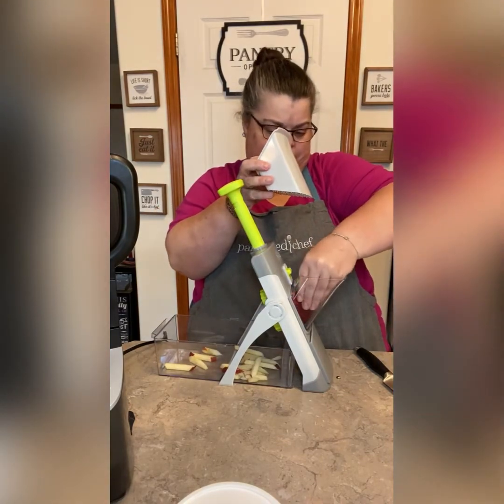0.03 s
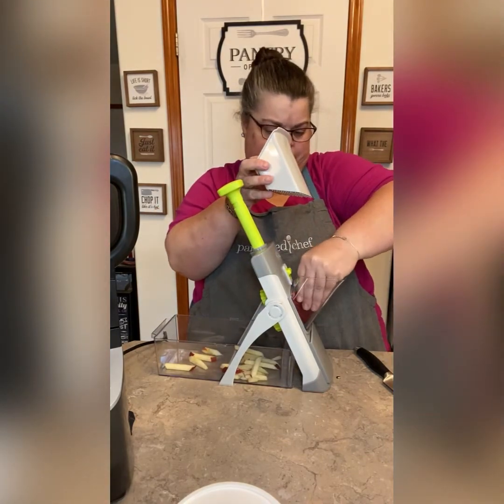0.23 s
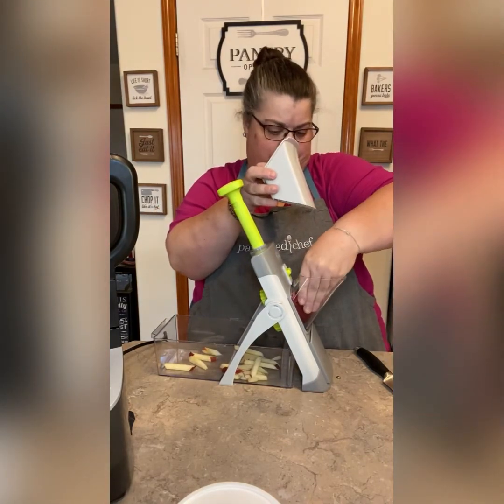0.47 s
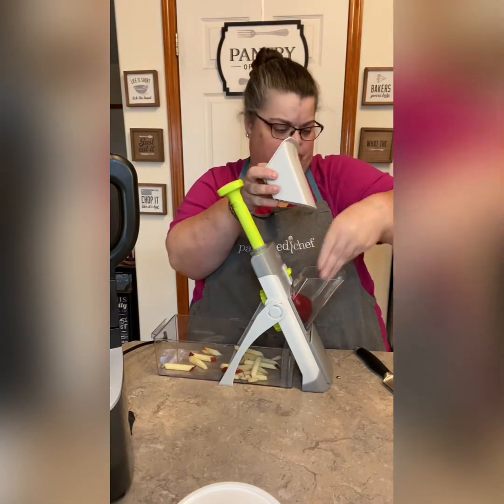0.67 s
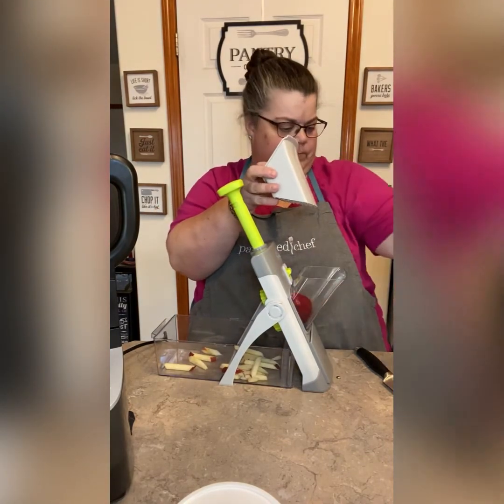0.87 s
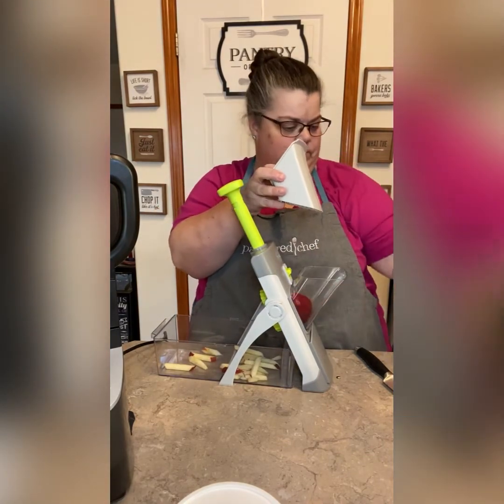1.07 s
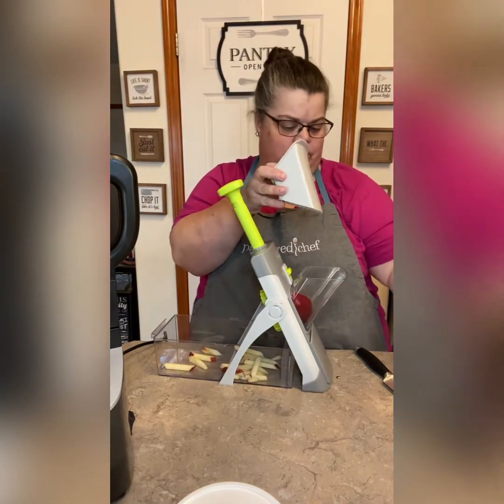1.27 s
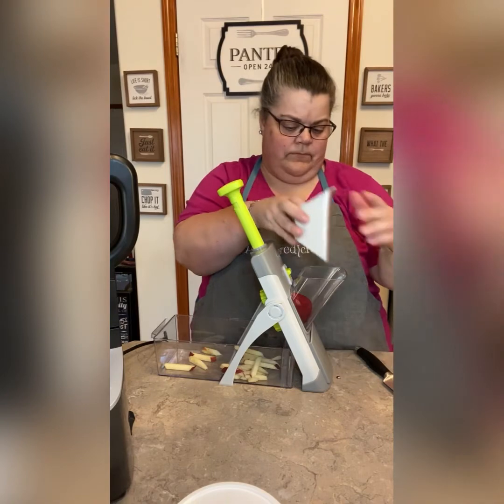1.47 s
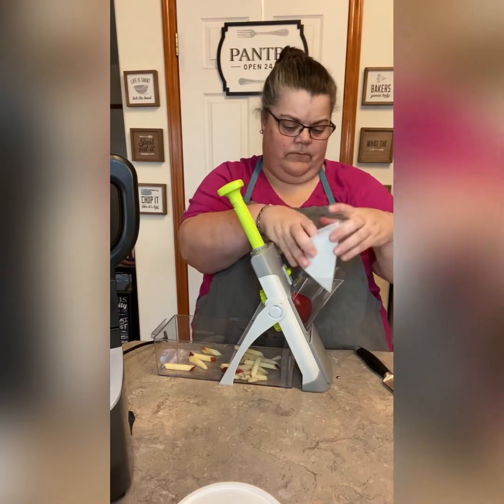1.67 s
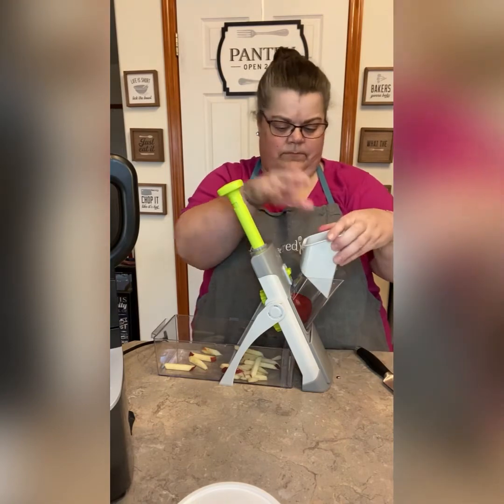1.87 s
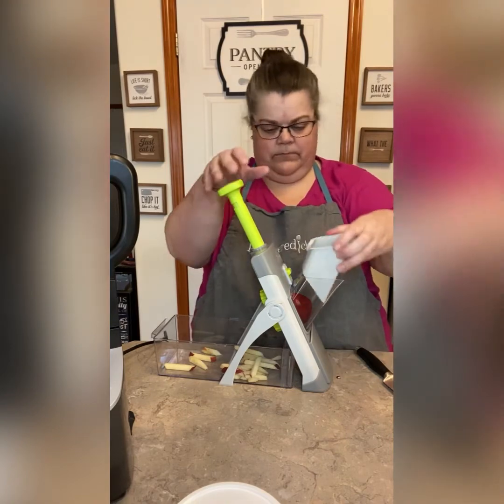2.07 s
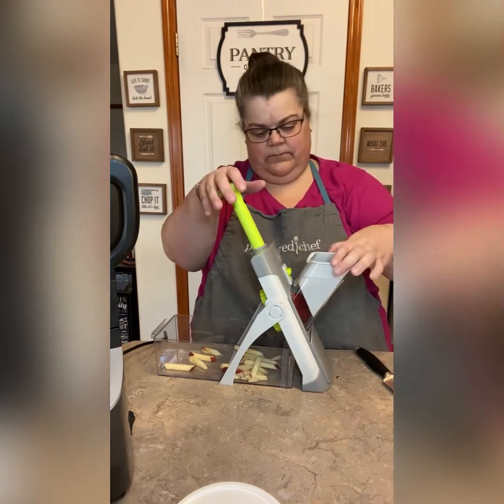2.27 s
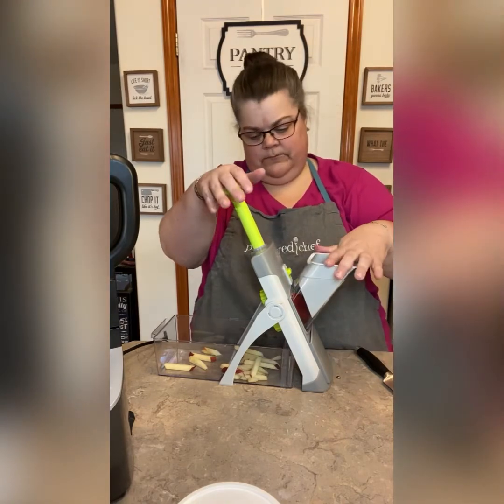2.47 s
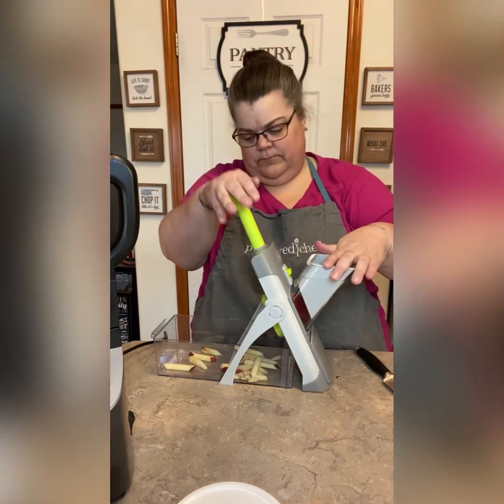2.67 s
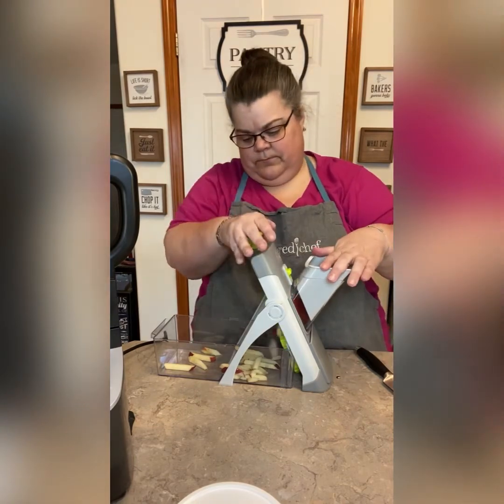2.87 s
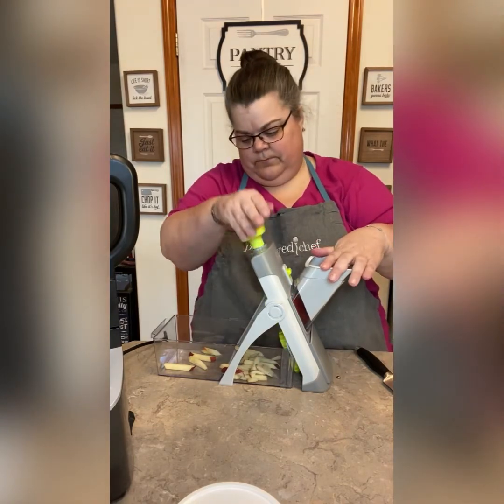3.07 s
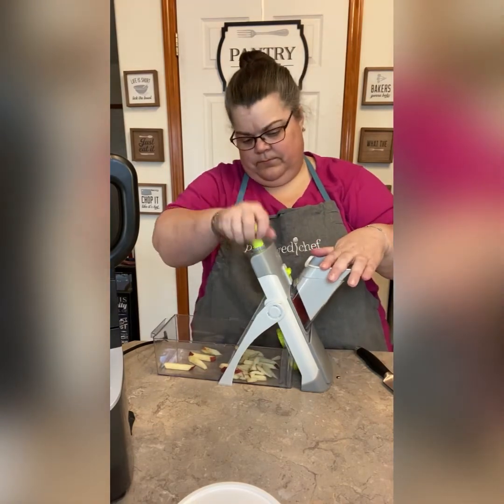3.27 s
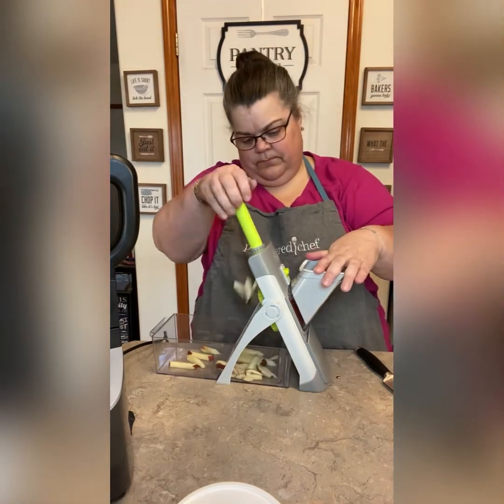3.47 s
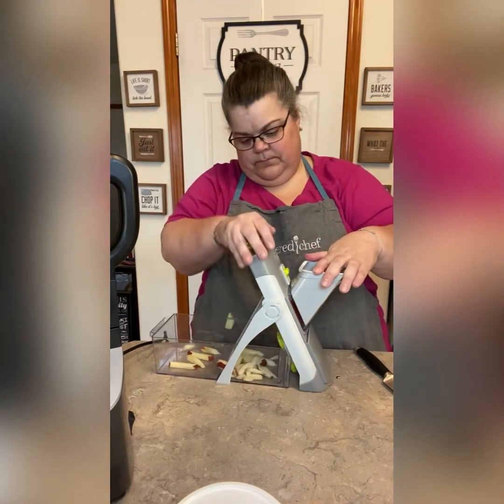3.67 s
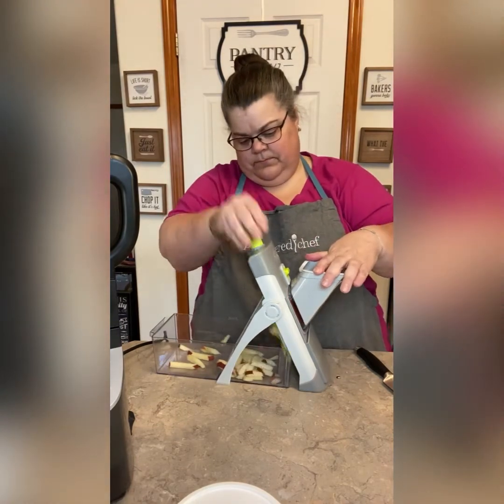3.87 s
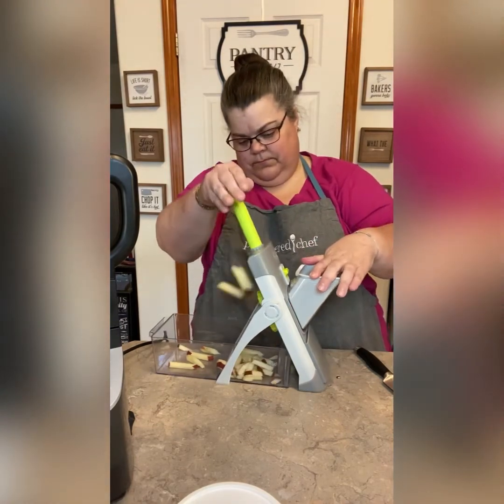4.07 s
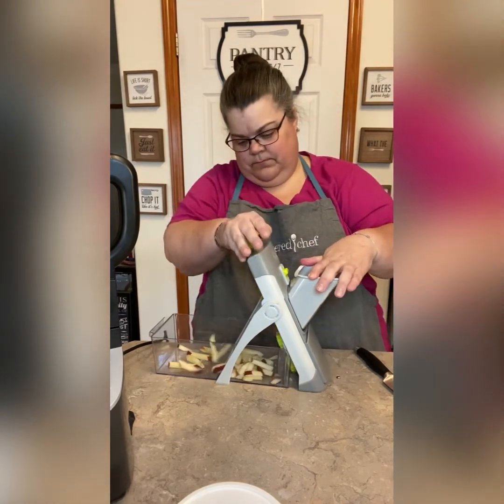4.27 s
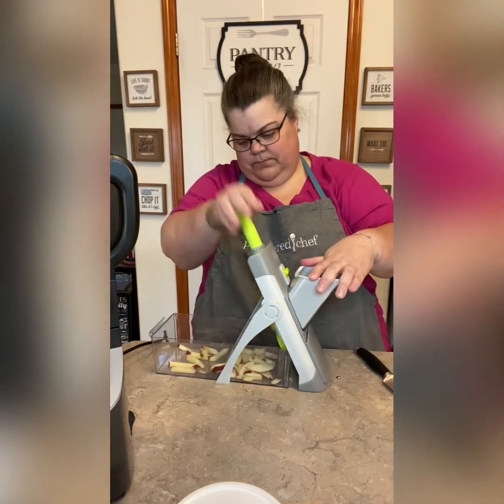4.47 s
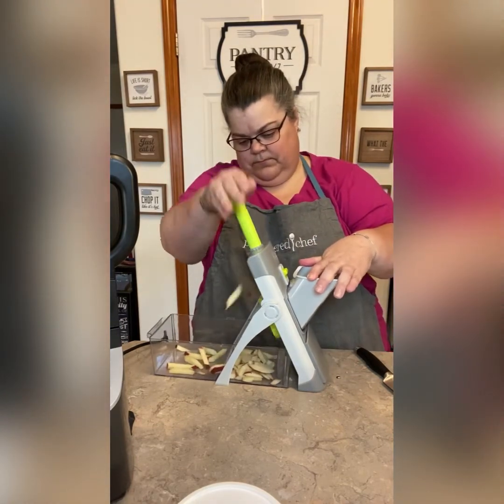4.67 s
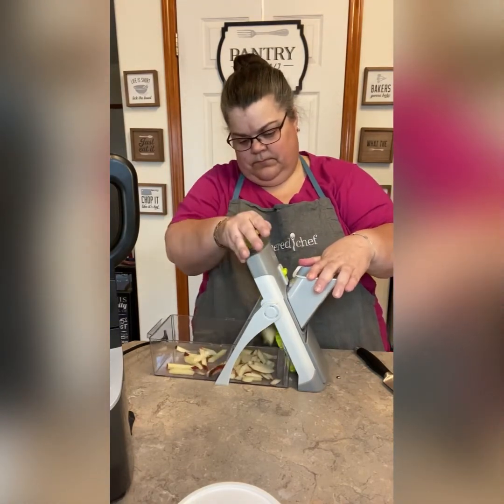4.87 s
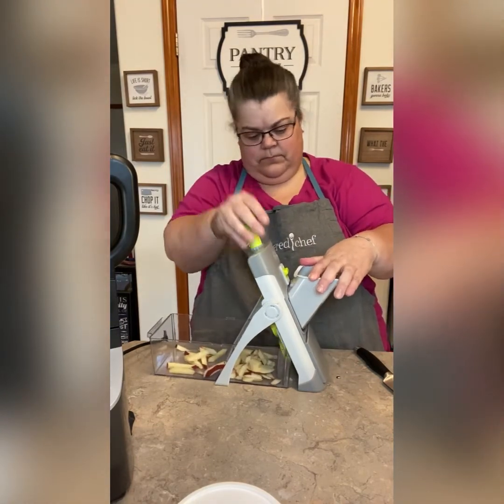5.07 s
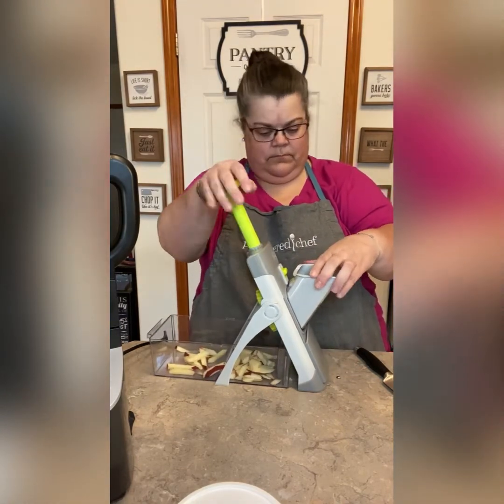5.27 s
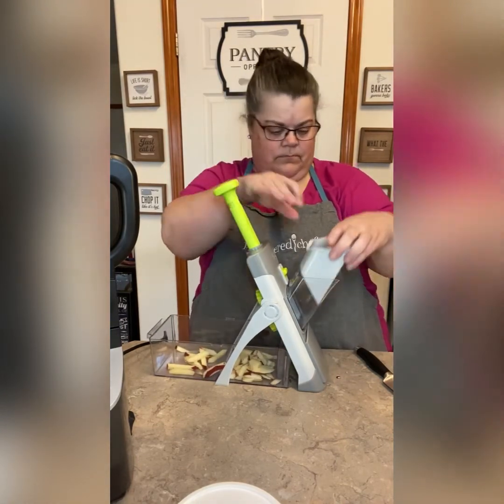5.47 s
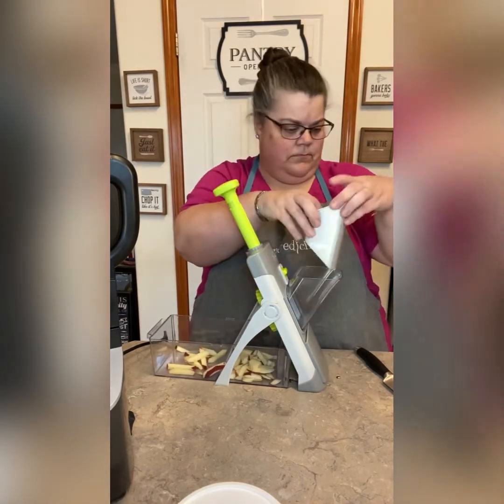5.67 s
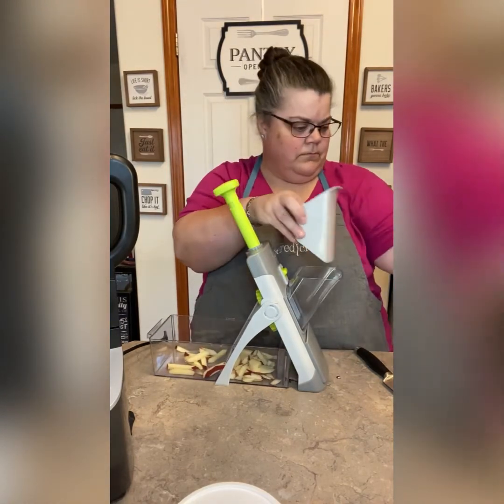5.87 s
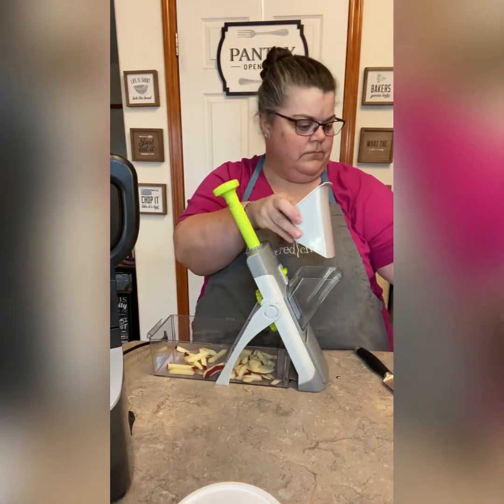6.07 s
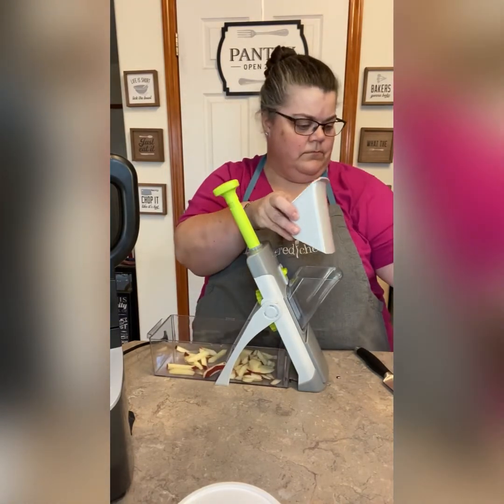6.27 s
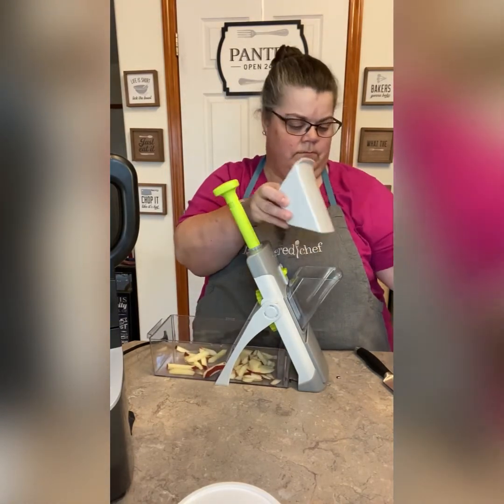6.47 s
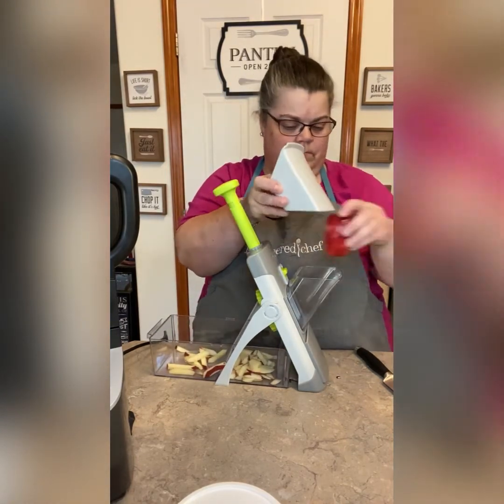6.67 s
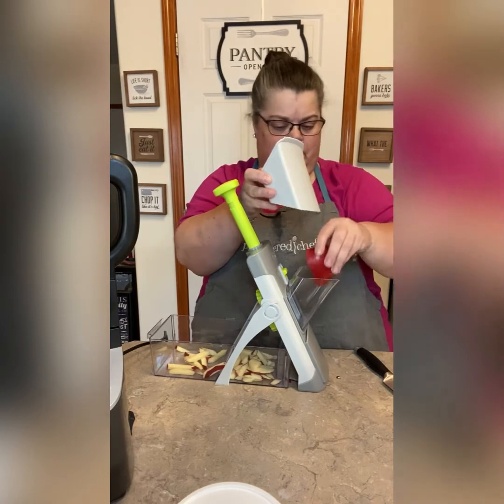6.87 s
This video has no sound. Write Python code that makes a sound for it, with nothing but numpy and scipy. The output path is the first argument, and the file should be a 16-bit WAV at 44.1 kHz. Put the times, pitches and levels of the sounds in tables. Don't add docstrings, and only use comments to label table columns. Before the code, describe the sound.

A plastic slicer's plunger is pumped four times, blade rasping through apple to heavy thumps and clacking back up in a hard, quiet kitchen.

```python
import sys
import numpy as np
from scipy import signal
from scipy.fft import rfft, irfft, next_fast_len
from scipy.io import wavfile
from scipy.ndimage import uniform_filter1d, map_coordinates

SR = 44100
rng = np.random.default_rng(int(sys.argv[2]) if len(sys.argv) > 2 else 0)


def voltage_ratio(decibels):
    exponent = np.asarray(decibels, float) / 20
    return 10 ** exponent


def persist_wave(psi):
    counts = np.round(np.clip(psi, -1, 1) * 32767).astype(np.int16)
    wavfile.write(sys.argv[1], SR, np.atleast_2d(counts).T)


N = 305172


def along(table, hz, axis=1):
    rows = np.array(table, float)
    return np.interp(np.log(hz + 1), np.log(rows[:, 0] + 1), rows[:, axis])


def share_of(k, centres, hz):
    return np.interp(np.log(hz + 1), np.log(centres), np.arange(len(centres)) == k)


def peak(hz, centre, width):
    return 1 / (1 + (2 * (hz - centre) / width) ** 2)


def colour(x, gain):
    size = next_fast_len(x.shape[-1], True)
    spectrum = rfft(x, size) * gain(np.fft.rfftfreq(size, 1 / SR))
    return irfft(spectrum, size)[..., :x.shape[-1]]


def unit(x):
    return x / np.sqrt(np.mean(x ** 2))


def walk(rate):
    k = int(SR / rate)
    return uniform_filter1d(np.repeat(rng.standard_normal(N // k + 1), k), k)[:N]


# f/Hz, left lead/rad
PORT_LEAD = [(60, 0), (200, .05), (430, -.2), (780, -.9), (1290, -.4), (2300, -.8), (4000, -.6),
             (7500, -.4), (9560, -1.1), (12200, -2.75), (16000, -3)]
# f/Hz, left minus right level/dB
PORT_DB = [(60, 0), (110, .3), (200, 1.2), (380, 3), (700, 3.6), (1290, 1.3), (2380, 1.2), (4400, -.3),
           (15000, -.2)]


def ports(x):
    def port(side):
        return colour(x, lambda hz: voltage_ratio(side * along(PORT_DB, hz) / 2) * np.exp(.5j * side * along(PORT_LEAD, hz)))
    return np.array([port(1), port(-1)])


# f/Hz, likeness/0..1
ALIKE = [(60, 1), (200, .995), (600, .25), (1500, .6), (3000, .2), (6000, .45), (14000, .9)]


def spread(size):
    same, left, right = rng.standard_normal((3, size))

    def alike(hz):
        return np.clip(along(ALIKE, hz), 0, 1)
    common = colour(same, lambda hz: np.sqrt(alike(hz)))
    own = colour(np.array([left, right]), lambda hz: np.sqrt(1 - alike(hz)))
    return ports(common) + own


# f/Hz, level/dB per Hz
FLOOR = [(20, -27), (60, -15), (146, -9.5), (270, -21), (410, -30.5), (825, -40.5), (1370, -47),
         (3000, -47.5), (4200, -53), (16000, -63.5)]
# f/Hz, width/Hz, level/dB
HUM = [(61, 8, -64), (122, 10, -67), (170, 4, -63), (240, 6, -70)]


def fridge():
    floor_db, air_db = -54.5, -6
    air = unit(colour(spread(N), lambda hz: voltage_ratio(along(FLOOR, hz))))
    air = voltage_ratio(floor_db + air_db + 0.43 * walk(1.4)) * air
    for centre, width, db in HUM:
        line = colour(rng.standard_normal(N), lambda hz: peak(hz, centre, width))
        air = air + voltage_ratio(db) * unit(line)
    return air


def swell(start, end, start_db, end_db):
    t = np.arange(0, N + 32, 32) / SR
    edge_s = .025
    edges = np.clip((t - start) / edge_s + .5, 0, 1) * np.clip((end - t) / edge_s + .5, 0, 1)
    return edges * voltage_ratio(np.interp(t, [start, end], [start_db, end_db]))


# start t/s, end t/s, start level/dB, end level/dB, hiss level/dB
SLIDES = [(-.01, 0.32, -83.5, -83, 11), (0.26, 0.49, -65.5, -96, 14), (1.513, 1.693, -46.5, -69.5, -15.5),
          (1.957, 2.133, -73, -47.5, -4), (2.133, 2.244, -48, -47.5, -10), (2.328, 2.537, -60, -74.5, 0.5),
          (2.535, 2.702, -76, -47.5, -2.5), (3.183, 3.242, -50, -63.5, -10.5),
          (5.314, 5.451, -68, -56, -0.5), (5.477, 5.583, -52, -58.5, -10), (5.58, 5.695, -52, -68, -5),
          (5.797, 5.98, -76.5, -86, -30), (4.28, 4.4, -50, -50, -27), (5.004, 5.117, -54.5, -55, -16),
          (6.259, 6.349, -84, -87.5, 8), (6.693, 6.824, -80, -85.5, 10.5)]


def slides():
    rumble_db, ring_db = -5, -4.5
    weights = 0
    for start, end, start_db, end_db, hiss_db in SLIDES:
        bands = voltage_ratio([rumble_db, 0, hiss_db, ring_db])
        weights = weights + np.outer(bands, swell(start, end, start_db, end_db))
    return weights


def patchy(x):
    depth_db, patch_hz, patch_s = 3.6, 350, .03
    hz, t, cells = signal.stft(x, SR, nperseg=256)
    field = rng.standard_normal((int(hz[-1] / patch_hz) + 2, int(t[-1] / patch_s) + 2))
    places = np.meshgrid(hz / patch_hz, t / patch_s, indexing="ij")
    lift = map_coordinates(field, places, order=1)
    return signal.istft(cells * voltage_ratio(depth_db * lift), SR, nperseg=256)[1][:N]


# f/Hz, level/dB per Hz
RASP = [(35, -41), (60, 6.5), (113, 5.5), (354, -9), (715, -15), (903, -18), (2090, -18.5), (4640, -27),
        (6140, -27.5), (11500, -33), (13000, -33), (13900, -96), (16000, -103.5)]
# f/Hz, width/Hz, level/dB
RASP_PEAKS = [(816.7, 47, 6), (1090, 200, -3), (2330, 150, -6.5), (3150, 110, -1), (5560, 2600, 2.5)]


def rasp_colour(hz):
    lift = sum(db * peak(hz, centre, width) for centre, width, db in RASP_PEAKS)
    return voltage_ratio(along(RASP, hz) + lift)


def pressed(band, weight):
    return unit(band) * np.repeat(weight, 32)[:N] * voltage_ratio(2.2 * walk(25))


RUB_HZ = [180, 1500, 7000]
# f/Hz, level/dB, t60/s
CHUTE = [(400, -8, .03), (560, -5, .025), (800, 0, .028), (960, -1, .022), (1300, -6, .014),
         (2260, -6, .012), (2560, -5, .012), (3100, -8, .008)]


def rubbing():
    snap_size, snaps_per_s = 2.5, 300
    grit = rng.standard_normal(N) * voltage_ratio(3.0 * walk(900) + 2.5 * walk(150) + walk(40))
    grit = patchy(grit * (1 + snap_size * (rng.random(N) < snaps_per_s / SR)))

    def chute_gain(hz):
        return sum(voltage_ratio(db) / (1 + 1j * (hz - centre) * t60 / 1.6) for centre, db, t60 in CHUTE)
    bands = [colour(grit, lambda hz: rasp_colour(hz) * share_of(k, RUB_HZ, hz)) for k in range(3)]
    bands.append(colour(grit, chute_gain))
    weights = slides() + cuts() + returns()
    return sum(pressed(band, weight) for band, weight in zip(bands, weights)) + squeak()


# f/Hz, t60/s, level/dB
ROOM = [(60, 0.041, -4.5), (198, 0.37, -8), (700, 0.4, -7.5), (2568, 0.37, -3), (7000, .4, -11.5),
        (12100, 0.4, -16.5)]


def kitchen(x):
    t, noise, tail = np.arange(SR) / SR, spread(SR), 0
    for k, (_, t60, db) in enumerate(ROOM):
        share = np.transpose([np.array(ROOM)[:, 0], np.arange(len(ROOM)) == k])
        fade = voltage_ratio(-60 * t / t60) * np.clip(t / 0.002 - .5, 0, 1)
        band = colour(noise, lambda hz: along(share, hz))
        tail = tail + voltage_ratio(db) * band * fade / np.sqrt(np.sum(fade ** 2))
    return signal.fftconvolve(x[None], tail, axes=1)[:, :N]


def ring(modes, t, scatter_db):
    hz, db, t60 = np.transpose(modes)[:, :, None]
    chance = rng.standard_normal((2, len(hz), 1))
    turn = 2 * np.pi * hz * (1 + 0.025 * chance[0]) * t
    return np.sum(voltage_ratio(db + scatter_db * chance[1]) * np.sin(turn) * voltage_ratio(-60 * t / t60), axis=0)


# f/Hz, level/dB, t60/s
COUNTER = [(59, -14, .4), (80, -5, .14), (98, -3, .13), (118, -3, .14), (172, -10, .2), (200, -8, .1),
           (245, -12, .12), (307, -18, .12), (388, -22, .1)]
# f/Hz, level/dB, t60/s
SWAY = [(60, -21, 0.13), (82.3, -9.5, 0.32)]


def thud(t):
    swing_hz, swing_s, sink_turns, sink_s = 98., .022, .8, .007
    hum_db, hum_on_s, sway_on_s = -7.5, .03, 0.056
    late = np.maximum(t[::8] - .0035, 0)
    turns = swing_hz * late + sink_turns * (1 - np.exp(-late / sink_s))
    swings = -np.sin(2 * np.pi * turns) * np.exp(-(late / swing_s) ** 2)
    hum = voltage_ratio(hum_db) * ring(COUNTER, late, 3.0) * (1 - np.exp(-late / hum_on_s))
    sway = ring(SWAY, late, 2.0) * (1 - np.exp(-late / sway_on_s))
    places = np.arange(len(t))
    return np.interp(places, places[::8], swings + hum + sway)


def chatter_of(after, rattle_s):
    push = rng.standard_normal(len(after)) * np.exp(-(after / rattle_s) ** 2)
    chatter = rfft(push * np.minimum(after / .001, 1))
    even = irfft(chatter / np.abs(chatter))
    loose = rng.standard_normal(len(after)) ** 3 * np.exp(-after / (3.1 * rattle_s))
    loose = loose * np.minimum(after / 0.0055, 1)
    return even / np.abs(even).max() + voltage_ratio(-26.5) * loose


# f/Hz, level/dB per Hz
CRACK = [(150, -12), (400, -3), (800, 0), (1550, -8), (2200, -4), (3200, -8), (4600, -16), (6200, -14),
         (10000, -22), (13200, -29), (14000, -55), (16500, -62), (17500, -110)]
BLOW_HZ = [330, 950, 2500, 7000]


def blows(table, voice_db, modes, rattle_s):
    crack_db, upper_per_hardness = 5, .6
    out, t = np.zeros(N + SR), np.arange(-256, 16128) / SR
    after, hz = np.maximum(t, 0), np.fft.rfftfreq(len(t), 1 / SR)
    crackle = voltage_ratio(along(CRACK, hz))
    shares = [share_of(k, BLOW_HZ, hz) for k in range(4)]
    thump_db, low_db, upper_db, high_db = voice_db
    for s, db, weight_db, hard_db in table:
        chatter = rfft(chatter_of(after, rattle_s) * (t > 0) * (t < .12))
        body = irfft(chatter * rfft(ring(modes, t[:2048] + 256 / SR, 2.5), len(t)))
        crack = irfft(chatter * crackle)
        spectrum = rfft(body / np.abs(body).max() + voltage_ratio(crack_db) * crack / np.abs(crack).max())
        sound = voltage_ratio(thump_db + weight_db) * thud(after)
        levels = (low_db + weight_db, 0, upper_db + upper_per_hardness * hard_db, high_db + hard_db)
        for share, share_db in zip(shares, levels):
            band = irfft(spectrum * share)
            sound = sound + voltage_ratio(share_db) * band * (t < .15) / np.abs(band).max()
        at = int(s * SR) - 256
        out[at:at + len(t)] += voltage_ratio(db) * sound
    return out[:N]


# t/s, clack level/dB, weight/dB (thump, low body), hardness/dB (upper body, crack)
SNAPS = [
    (.064, -70, -8, 4),
    (.267, -60.5, -4, 6),
]
# thump level/dB, low body level/dB, upper body level/dB, crack level/dB
SNAP_DB = (-15, -15, 12, 26.5)


def snaps():
    return blows(SNAPS, SNAP_DB, CHUTE, .004)


# t/s, clack level/dB, weight/dB, hardness/dB
TICKS = [(.283, -70, 0, 2), (.29, -63, 0, 4), (3.305, -40, 1, 19), (3.329, -32, 11, 22), (3.8, -65, 2, 7),
         (4, -21.5, 3.5, -6.5), (5.535, -48, 1.5, -4.5), (6.15, -70, -2, 0), (6.29, -72, -1.5, -2),
         (6.325, -68, -5, 14), (6.745, -71, -3, -3)]
# thump, low body, upper body, crack level/dB
TICK_DB = (-20.5, -11.5, 4, 3)


def ticks():
    return blows(TICKS, TICK_DB, CHUTE, 0.00064)


# t/s, clack level/dB, weight/dB, hardness/dB
PUSHER = [(1.512, -31.5, 8, 9.5), (1.666, -20, -9, 3.5), (1.691, -27, 0, 3.5), (1.977, -36, -25, -10),
          (2.123, -18.5, -12, 7), (2.154, -25, -33, -7), (2.199, -27.5, -17.5, -23.5),
          (2.343, -25.5, -23, -8.5), (5.002, -34.5, 14, -12), (5.009, -46.5, -23, 18), (5.049, -36.5, 1, 0),
          (5.123, -31.5, -5, -18.5), (5.449, -38, -2, -19), (5.467, -29.5, -4, 4), (5.59, -49, -9, 1)]
# thump, low body, upper body, crack level/dB
PUSHER_DB = (-17, -9.5, -2, -10.5)


def pusher():
    return blows(PUSHER, PUSHER_DB, CHUTE, 0.0044)


# t/s, clack level/dB, weight/dB, hardness/dB
BUMPS = [
    (1.535, -55, 1, -4),
    (2.15, -42, -2, -12),
    (2.233, -31.5, -6.5, 8),
    (5.845, -55, 5, 4),
    (6.22, -79, 17.5, -6),
    (6.412, -60, 18.5, -8),
    (6.903, -67.5, 14, 25.5),
]
# thump, low body, upper body, crack level/dB
BUMP_DB = (2, -6.5, -11, -30)


def bumps():
    return blows(BUMPS, BUMP_DB, CHUTE, 0.008)


# t/s, clack level/dB, weight/dB, hardness/dB
JOLTS = [(2.674, -32.5, 9, 4.5), (2.893, -21, 1.5, -11), (3.052, -29.5, -3.5, 5.5), (3.182, -38, 3, 12.5),
         (3.19, -28, 5, -14.5), (3.256, -34.5, 7.5, -11), (3.274, -24, -9, 2), (3.403, -18, 9, 16.5),
         (4.379, -27.5, 4.5, -14), (4.468, -17, -7.5, -12), (4.704, -36.5, 2, 2.5)]
# thump, low body, upper body, crack level/dB
JOLT_DB = (-13, -4, -9.5, -16)


def jolts():
    return blows(JOLTS, JOLT_DB, CHUTE, 0.0012)


def strokes(travels, stops, rumble_db, ring_db):
    weights, overrun_s = 0, .012
    for (travel, db, climb_db, hiss_db), (stop, *_) in zip(travels, stops):
        bands = voltage_ratio([rumble_db, 0, hiss_db, ring_db])
        weights = weights + np.outer(bands, swell(stop - travel, stop + overrun_s, db - climb_db, db))
    return weights


# travel t/s, end rasp level/dB, climb/dB, hiss level/dB
CUTS = [
    (0.12, -39, 11, 0.5),
    (.14, -33, 12, -4.5),
    (0.12, -36.5, 9, -3.5),
    (0.035, -34.5, 6.5, -2),
]


def cuts():
    return strokes(CUTS, BOTTOM, rumble_db=0.85, ring_db=-10)


# t/s, clack level/dB, weight/dB, hardness/dB
BOTTOM = [
    (2.809, -8.5, 0, -0.5),
    (3.661, -11, -0.5, 0.5),
    (4.251, -13, -1, -10.5),
    (4.763, -14.5, 1, 1),
]
# thump, low body, upper body, crack level/dB
BOTTOM_DB = (9, -0.5, -2, -5.5)
# f/Hz, level/dB, t60/s
FRAME_DOWN = [(300, -4, .035), (576, -3, .025), (760, 0, .025), (942, -3, .02), (1180, -1, .016),
              (1350, -4, .014), (2073, -6, .012), (2600, -9, .01)]


def bottom_thumps():
    return blows(BOTTOM, BOTTOM_DB, FRAME_DOWN, 0.0041)


# travel t/s, end rasp level/dB, climb/dB, hiss level/dB
RETURNS = [
    (.1, -28.5, 18.5, -11.5),
    (.115, -31, 21, -7),
    (.12, -38.5, 9.5, -7.5),
    (.15, -50.5, 18.5, -3),
]


def returns():
    return strokes(RETURNS, TOP, rumble_db=2.5, ring_db=-8.5)


# t/s, clack level/dB, weight/dB, hardness/dB
TOP = [
    (3.348, -7.5, -2.5, -1),
    (3.937, -8, -0.5, 1),
    (4.517, -7, 2.5, -0.5),
    (5.171, -10.5, -3, -2),
]
# thump, low body, upper body, crack level/dB
TOP_DB = (-10.5, -7, 1.5, -0.5)
# f/Hz, level/dB, t60/s
FRAME_UP = [(350, -8, .035), (650, -4, .025), (790, 0, .03), (1050, -5, .016), (1250, -6, .014),
            (2070, -1, .016), (2350, -3, .012), (2750, -6, .01), (3230, -9, .008)]


def top_clacks():
    return blows(TOP, TOP_DB, FRAME_UP, .0054)


# start t/s, end t/s, f/Hz, width/Hz, level/dB
SQUEAK = (6.685, 6.79, 880, 140, -64)


def squeak():
    start, end, centre, width, db = SQUEAK
    band = colour(rng.standard_normal(N), lambda hz: peak(hz, centre, width))
    return pressed(band, swell(start, end, db, db - 3))


def scene():
    near = rubbing() + snaps() + ticks() + pusher() + bumps() + jolts() + bottom_thumps() + top_clacks()
    no_deep_bass = signal.butter(3, 52., "high", fs=SR, output="sos")
    near = signal.sosfilt(no_deep_bass, near)
    return ports(near) + kitchen(near) + fridge()


def low_pass(x):
    return signal.sosfilt(signal.butter(12, 16470, fs=SR, output="sos"), x)


# f/Hz, level/dB
MIC = [(45, 1), (90, 0.5), (1250, 2), (1700, -1), (2500, 1), (10000, -0.45), (13000, 7), (14500, -11)]


def record(dry):
    heard = colour(dry, lambda hz: voltage_ratio(along(MIC, hz)))
    mix = np.tanh(1.15 * heard) / 1.215
    return low_pass(mix)


dry = scene()
out = record(dry)
persist_wave(out)
```